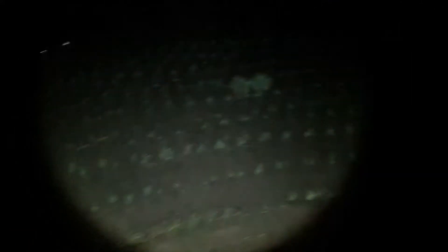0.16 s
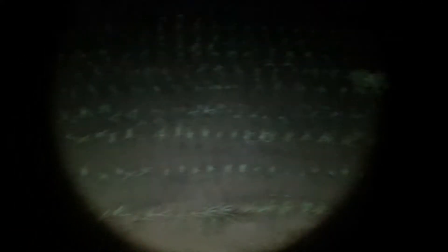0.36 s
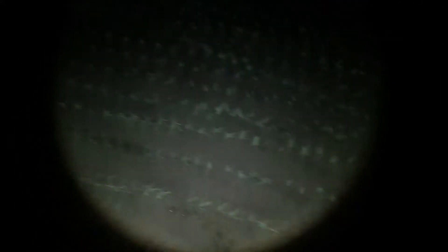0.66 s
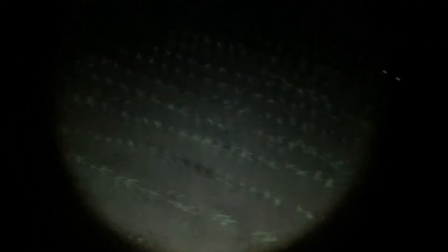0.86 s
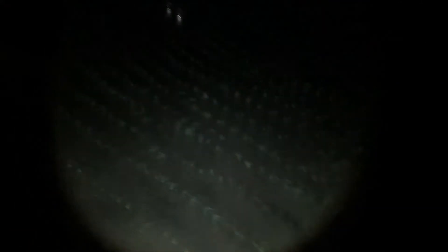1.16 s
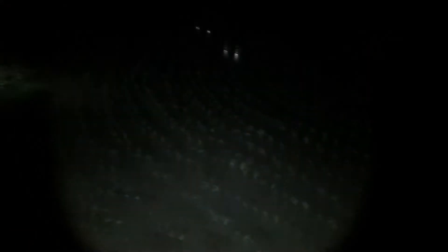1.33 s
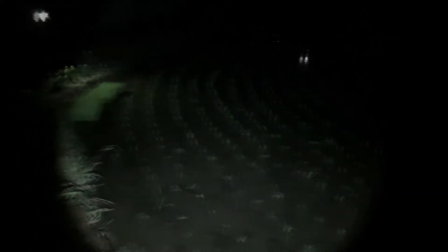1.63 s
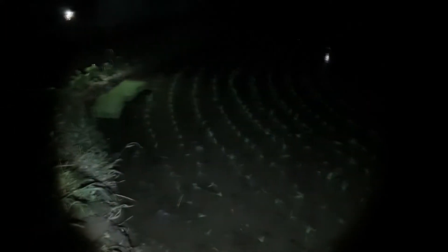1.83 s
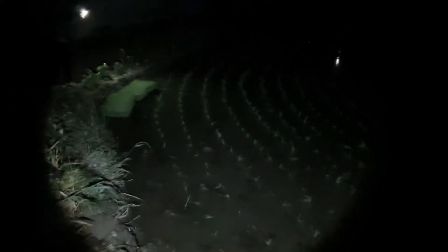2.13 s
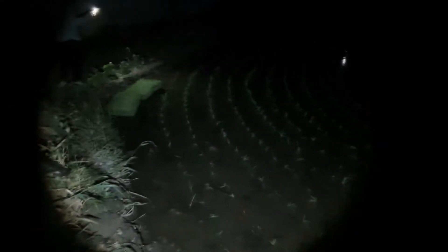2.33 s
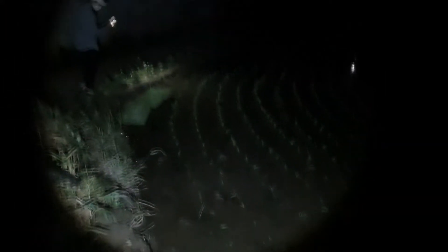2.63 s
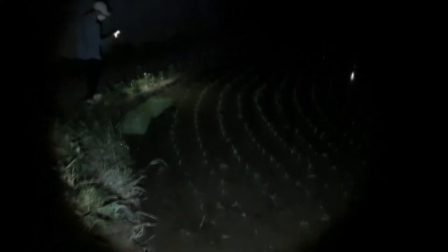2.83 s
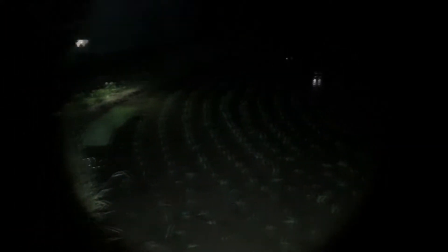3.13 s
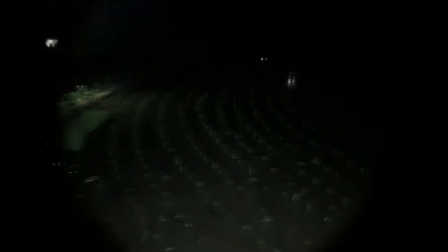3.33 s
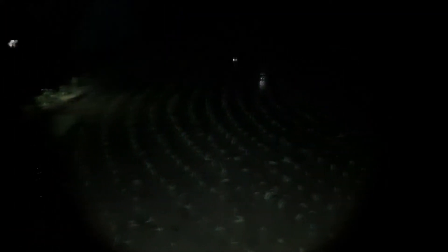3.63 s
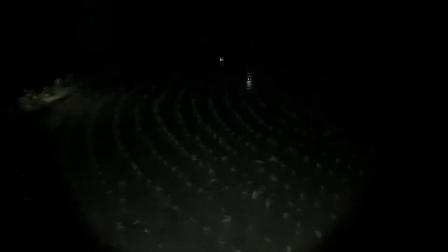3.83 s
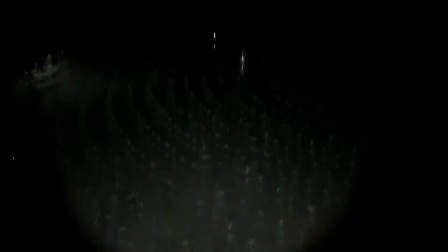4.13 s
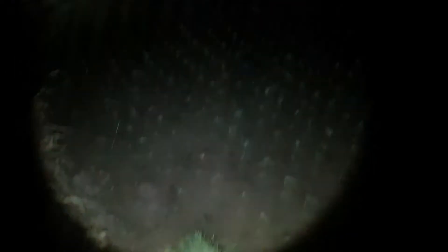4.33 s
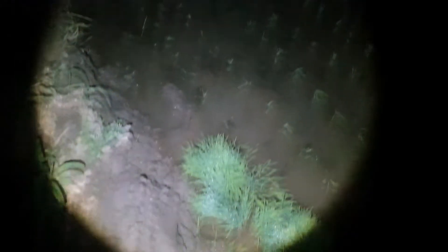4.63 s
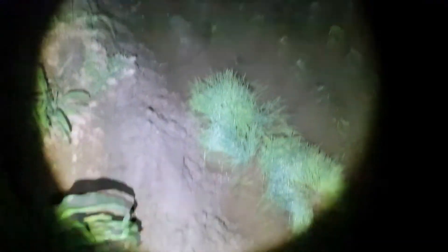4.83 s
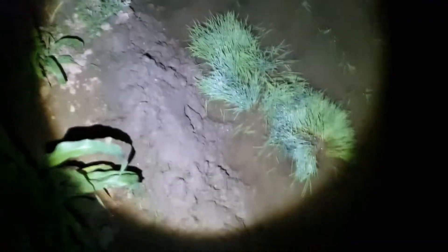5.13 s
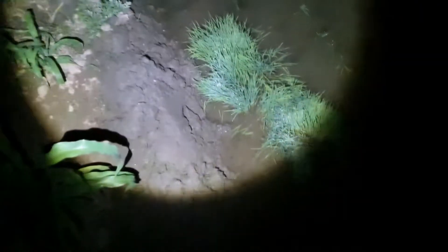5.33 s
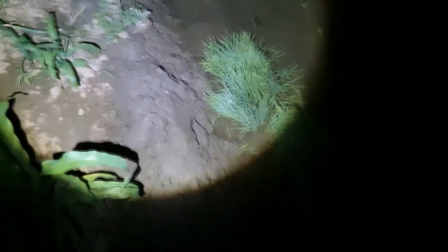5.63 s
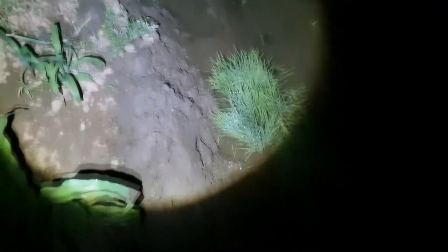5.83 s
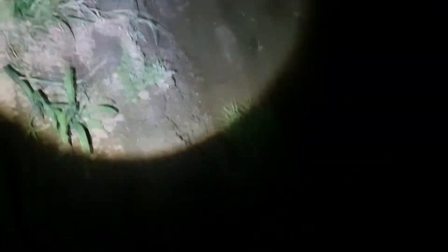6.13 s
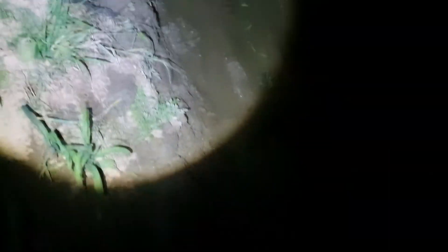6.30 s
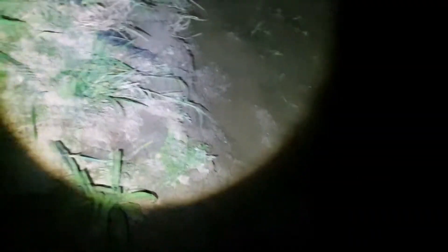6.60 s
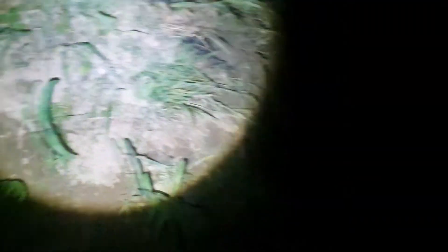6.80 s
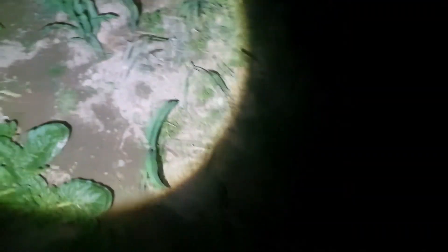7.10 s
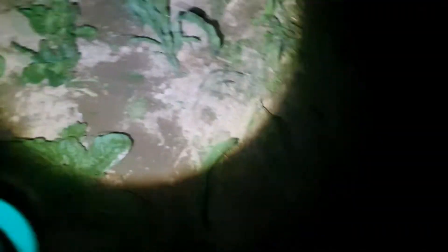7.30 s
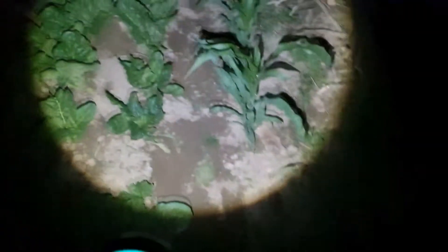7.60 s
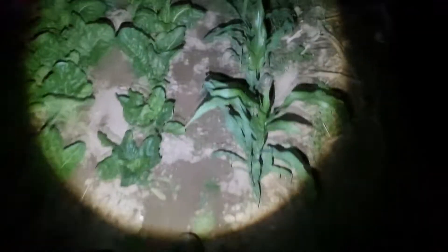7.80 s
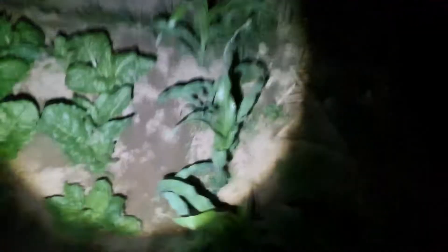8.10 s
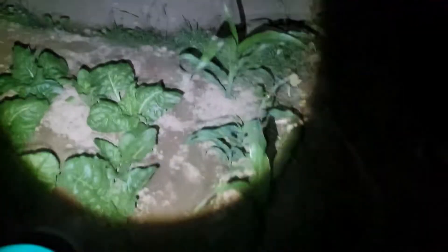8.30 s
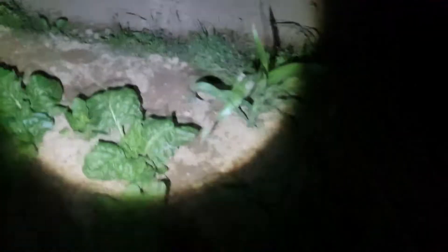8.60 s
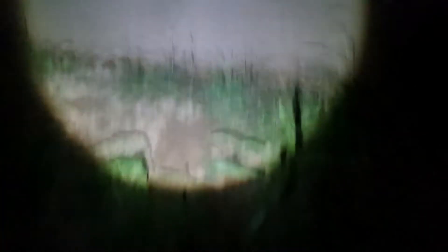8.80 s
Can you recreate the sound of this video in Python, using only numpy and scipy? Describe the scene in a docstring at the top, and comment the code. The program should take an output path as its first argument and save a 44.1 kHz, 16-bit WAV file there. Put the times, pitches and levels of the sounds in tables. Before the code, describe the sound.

Outdoors at night by a flooded field, many tree frogs give short, high, pulsed calls that overlap almost without pause from both sides, over a far chorus. One nearby frog adds six smooth squeaks midway. Later leaves brush and stems snap, mostly on the right, with a few dull footfalls. Low traffic rumble lies beneath; handheld spaced stereo microphones.

```python
"""Tree frogs call in overlapping pulsed notes around a flooded field at night, over a far chorus and distant traffic.
One frog close by gives six smoother, squeaky notes. A walker carrying two spaced microphones brushes through plants.
Frogs are pulse trains ringing a vocal sac, or hoarse pulses through throat resonances, with echoes off the field.
Traffic is wavering drones and shaped noise, plants are crackling hiss and snaps, footfalls are short dull knocks."""
import sys
import numpy as np
from scipy import signal
from scipy.fft import rfft, irfft, next_fast_len
from scipy.io import wavfile
from scipy.ndimage import uniform_filter1d

SR = 44100
rng = np.random.default_rng(int(sys.argv[2]) if len(sys.argv) > 2 else 0)


def materialize(psi):
    """Save the field psi as 16-bit PCM at rate SR to the path in sys.argv[1].

    A 1-D psi becomes a single channel; in a 2-D psi each row is a channel.
    """
    bounded = np.clip(np.atleast_2d(psi).T, -1, 1)
    quanta = np.round(bounded * 32767).astype(np.int16)
    wavfile.write(sys.argv[1], SR, quanta)


N = 394694

# near frog notes, grouped by the side they come from:
# left over right/dB, left lags right/ms, overtones/dB, low ring/dB, notes as (t/s, level/dB)
NEAR_NOTES = [ (-0.2, .51, 0.9, 2, [(.281, -18), (.508, -17), (.741, -16)]),
              (0, .44, -1, -0.8, [(.023, -19), (.35, -34.5), (.955, -15), (1.508, -18), (1.759, -20.5),
              (2.23, -30.5), (2.445, -25), (2.493, -20.5), (2.66, -28), (2.759, -18.5), (3.194, -19),
              (3.28, -31), (3.43, -28.5), (3.502, -22.5), (3.99, -34), (3.645, -17.5), (4.198, -17.5),
              (4.552, -23), (4.738, -20.1), (4.78, -23), (5.033, -18), (5.14, -22), (5.224, -24),
              (6.143, -20.5), (6.417, -27.5), (6.765, -18.5), (7.165, -23), (7.248, -23.5), (7.858, -24),
              (8.614, -24.5)]), (5.5, .46, -1.3, -0.3, [(.09, -21), (.572, -22.5), (.798, -22.5),
              (1.004, -19.5), (1.05, -24), (1.321, -24), (1.571, -17.5), (1.893, -21), (2.704, -23.5),
              (2.793, -20.5), (3.556, -26), (4.14, -21), (4.453, -20), (4.601, -20.5), (4.906, -19.5),
              (5.077, -23), (5.388, -17), (5.718, -22.5), (5.93, -27.5), (6.465, -26.5), (6.835, -24),
              (7.1, -24.5), (7.314, -23), (7.98, -24.5), (8.308, -23.5), (8.563, -27), (8.867, -25)]),
              (0.4, -0.43, -1, -1, [(1.212, -19), (2.033, -19.5), (2.295, -23), (2.559, -22.5),
              (2.996, -19.5), (3.235, -17.5), (3.725, -26), (3.897, -16.5), (3.938, -21), (4.328, -19.5),
              (4.945, -26), (5.268, -17.5), (5.675, -18.5), (6.001, -19), (6.985, -24.5), (7.556, -20),
              (8.021, -18.5), (8.15, -24)]), (6.5, -.44, 0, -0.9, [(1.248, -24.5), (1.812, -25),
              (2.078, -23.5), (2.33, -20.5), (3.03, -28.5), (5.781, -21.5), (6.05, -23.5), (6.307, -17.5),
              (6.563, -25.5), (6.603, -21.5), (6.881, -27), (7.423, -23.5), (7.698, -19.5), (7.792, -25.5),
              (8.213, -26.5), (8.437, -22), (8.752, -24.5)])]
# far chorus: t/s, level/dB, level change with time since the last near note/dB per s
FAR_COURSE = [(0, -42, -69.5), (3, -41, -69.5), (4.1, -43, -60), (6, -37, -29.5), (8.95, -38, -25)]
SAC_HZ = 2914.4  # central pitch of the vocal sac


def gain_of(db):
    """Decibels to gain."""
    return 10 ** (np.asarray(db) / 20)


def evened(x):
    """Scales to rms 1."""
    return x / np.sqrt(np.mean(x ** 2) + 1e-20)


def read(points, hz):
    """Reads a table of (f/Hz, value) on a log frequency axis."""
    f, value = np.transpose(points)
    return np.interp(np.log(hz + 1), np.log(f + 1), value)


def along(rows):
    """Draws the columns of a time table out to every sample."""
    s, *columns = np.transpose(rows)
    return [np.interp(np.arange(N) / SR, s, c) for c in columns]


def add(mix, s, sound):
    """Mixes a sound in at a time, cut off at the end of the scene."""
    part = mix[max(round(s * SR), 0):][:len(sound)]
    part += sound[:len(part)]


def place(mix, s, sound, pan_db, lag_ms):
    """Reaches the two microphones with a level and time difference, split evenly between them."""
    add(mix[0], s + lag_ms / 2000, gain_of(pan_db / 2) * sound)
    add(mix[1], s - lag_ms / 2000, gain_of(-pan_db / 2) * sound)


def resonate(x, hz, width):
    """Shifts the curve hz down to zero, smooths, and shifts back: a resonance of gain 1."""
    turn = np.exp(2j * np.pi * np.cumsum(hz * np.ones(len(x))) / SR)
    r = np.exp(-np.pi * width / SR)
    smooth = signal.lfilter([1 - r], [1, -r], x / turn)
    return 2 * (turn * smooth).real


def noise(spectrum, patchy_db, size=2048):
    """Two-channel noise of a spectrum with drifting patches; the channel likeness varies with frequency."""
    # f/Hz, left-right likeness from -1 (opposed) to 1 (alike)
    likeness = [(60, 1), (130, 0.97), (290, 0.81), (640, 0.31), (1410, -0.32), (3100, 0.091), (6820, -0.39),
                (15000, 1)]
    frames, hz = 4 * N // size + 5, np.fft.rfftfreq(size, 1 / SR)
    a, b, c, d, patches = rng.standard_normal((frames, len(hz), 5)).T
    patches = uniform_filter1d(patches, size=12, axis=0)  # over frequency
    patches = evened(uniform_filter1d(patches, size=10, axis=1))  # over time
    same = np.clip(read(likeness, hz), -1, 1)[:, None]
    left = a + 1j * b
    right = same * left + np.sqrt(1 - same ** 2) * (c + 1j * d)
    z = np.array([left, right]) * gain_of(read(spectrum, hz)[:, None] + patchy_db * patches)
    return evened(signal.istft(z, nperseg=size, noverlap=3 * size // 4)[1][:, :N])


def note(hz, overtones_db, low_db=0, jitter=.025, uneven_db=1.2):
    """A quickening train of laryngeal pulses, each ringing the vocal sac afresh as its pitch climbs."""
    # what each pulse rings: multiple of the sac pitch, relative level/dB, time to the peak/ms
    sac_rings = [(0.454, -12.5, 1.016), (0.801, -22.5, 1.26), (1, -5, 1.8), (1.246, -27, 1.5),
                 (1.559, -30.5, 1.03), (1.949, -30.5, 0.37), (2.599, -26.5, 0.42), (2.897, -30.5, 1.8)]
    # course of a note: share of its length, level/dB, pitch factor, pulse rate/Hz before each note's own scatter
    course = [(0, -14, .915, 195), (.25, -5, .96, 208), (.55, -.5, 1.005, 222), (.8, -1, 1.03, 235),
              (1, -9, 1.035, 240)]
    note_s = .097
    low_early_db = 4  # extra low ring at the start of a note, gone by its end
    share, *columns = np.transpose(course)
    u = np.arange(round(note_s * SR)) / (note_s * SR)
    db, bend, rate = (np.interp(u, share, c) for c in columns)

    own_rate = 1 + .04 * rng.standard_normal()
    chance = rng.standard_normal((40, 3))
    pulse_count = np.floor(np.cumsum(rate * own_rate) / SR)
    at = np.flatnonzero(np.diff(pulse_count, prepend=-1))
    chance = chance[:len(at)]
    start = np.maximum(at + (jitter * chance[:, 0] * SR / rate[at]).astype(int), 0)

    t = np.arange(400) / SR
    pulse_hz = (hz * bend[at] * (1 + .008 * chance[:, 1]))[:, None]
    low_ring_db = low_db + low_early_db * (1 - u[at, None])
    rings = 0
    for multiple, ring_db, peak_ms in sac_rings:
        rise = 1000 * t / peak_ms
        swell = (rise * np.exp(1 - rise)) ** 2
        colour_db = ring_db + overtones_db * (multiple > 1.4) + low_ring_db * (multiple < .6)
        rings = rings + gain_of(colour_db) * swell * np.sin(2 * np.pi * multiple * pulse_hz * t)
    rings = rings * gain_of(db[at] + uneven_db * chance[:, 2])[:, None]

    out = np.zeros(len(u) + 800)  # room for the last rings
    np.add.at(out, start[:, None] + np.arange(len(t)), rings)
    return out


def near_frogs():
    """Every near note from its side, its balance and overtones shifted by the walker's turning."""
    # the walker turns: t/s, added left over right/dB, added overtones/dB
    turning = [(0, -0.7, 0.8), (3, -0.8, -0.9), (4.8, -0.8, -1), (6.5, -1.4, -2), (7.5, 2.5, 0),
               (8.95, 0.5, 1)]
    scatter_ms, scatter_db = .04, 1.5  # notes on one side differ a little in lag and in overtones
    out, (swing_db, shade_db) = np.zeros((2, N)), along(turning)
    for pan_db, lag_ms, overtones_db, low_db, notes in NEAR_NOTES:
        for s, db in notes:
            n, (pitch, lag, colour) = round(s * SR), rng.standard_normal(3)
            note_overtones_db = overtones_db + shade_db[n] + scatter_db * colour
            sound = note(SAC_HZ * (1 + .012 * pitch), note_overtones_db, low_db)
            place(out, s, gain_of(db) * sound, pan_db + swing_db[n], lag_ms + scatter_ms * lag)
    return out


def squeaks():
    """Fast pulses, steady at first and then hoarse, through a throat whose resonances climb."""
    # squeaky notes: t/s, starting pitch f/Hz, level/dB
    squeak_notes = [(4.455, 544, -36), (4.732, 554, -34), (5.008, 567, -33.5), (5.262, 589, -33),
                    (5.517, 588, -32.5), (5.782, 585, -34)]
    # throat resonances before the opening moves them: f/Hz, width/Hz, level/dB
    throat_resonances = [(1340, 390, 8), (1880, 1400, -4.5), (2380, 840, 3), (3630, 660, -2),
                         (7100, 1270, -14.5), (7700, 3600, -27)]
    squeak_s, top_hz = .096, 630
    fresh_rough, tired_rough, tires_s = .22, .62, 5  # starting roughness 0-1 before and after the voice tires
    treble_climb = 2.3  # resonances over 5000 Hz climb with this power of the opening
    out = np.zeros((2, N))
    for s, first_hz, db in squeak_notes:
        n = round(squeak_s * SR)
        u = np.linspace(0, 1, n)
        rough = fresh_rough if s < tires_s else tired_rough
        hoarse = np.clip(rough + .5 * u ** 4, 0, 1)  # breaks up at the end
        wobble = evened(uniform_filter1d(rng.standard_normal(n), size=60))
        pitch_hz = first_hz + (top_hz - first_hz) * u ** .8
        turns = np.cumsum(pitch_hz * (1 + .09 * hoarse * wobble)) / SR
        folds = sum(np.cos(2 * np.pi * k * turns) for k in range(1, 15))
        puffs = np.exp(-(turns % 1) / 0.59) * rng.standard_normal(n)  # a burst of breath in each cycle
        drive = (1 - hoarse) * evened(folds) + hoarse * evened(puffs)

        opening = 0.844 + 0.17 * u
        throat = 0
        for k, (f, width, ring_db) in enumerate(throat_resonances):
            moving_hz = f * opening ** (treble_climb if f > 5000 else 1)
            ring = resonate(resonate(drive, moving_hz, width), moving_hz, width)
            throat = throat + (-1) ** k * gain_of(ring_db) * ring  # alternating sign
        sound = gain_of(db) * evened(throat) * signal.windows.tukey(n, .45)
        place(out, s, sound, -1.2, -.4)
    return out


def field(x):
    """Echoes off water and plants: sparse taps of random sign, other ones at each microphone, with the treble lost."""
    t60, dull_hz = .22, 3600  # decay by 60 dB in s, treble cutoff in Hz
    # one tap at random in every 20 samples
    at = np.arange(100, SR // 2 - 20, 20) + rng.integers(0, 20, (2, (SR // 2 - 101) // 20))
    strength = rng.choice([-1., 1.], at.shape) * gain_of(-60 * at / SR / t60)
    taps = np.zeros((2, SR // 2))
    np.put_along_axis(taps, at, strength, 1)
    dull = signal.sosfilt(signal.butter(2, dull_hz, fs=SR, output="sos"), x)
    return signal.fftconvolve(dull, taps / np.linalg.norm(taps[0]), axes=1)[:, :N]


def plants():
    """Leaves scrape as hiss with fine crackles, stems snap; mostly on the right."""
    # plants brushing past: t/s of the peak, level/dB before panning, time to swell or fade by 20 dB/s
    brushes = [(4.8, -64.5, 1.1), (5.73, -52, 0.07), (5.8, -54.5, 0.1), (5.95, -65, .5), (6.5, -57.5, 0.2),
               (7.0, -64, 0.8), (7.25, -62.5, 0.2), (7.55, -49, .08), (7.75, -54.5, 0.09),
               (7.99, -62, 0.22), (8.07, -57.5, .15), (8.24, -45, 0.02), (8.42, -55.5, 0.34),
               (8.6, -60, 0.34), (8.75, -60.5, 0.2)]
    # stems snapping: t/s, starting level/dB before panning
    snaps = [(2.6515, -59), (5.6956, -59), (5.8218, -46), (6.7212, -50), (7.405, -49), (7.501, -61),
             (7.6441, -56), (7.7115, -49), (7.9494, -60), (8.2612, -44), (8.2857, -47), (8.414, -50),
             (8.61, -47)]
    # leaf hiss: f/Hz, relative level/dB per Hz
    leaf_spectrum = [(300, -27.5), (1000, -7), (3000, -1), (6000, -13.5), (9000, -3), (11000, 6),
                     (13000, -2.5), (15500, -12.5)]
    crackles_per_s, crackle_share, patchy_db = 600, .15, 2.5
    t = np.arange(N) / SR
    level = sum(gain_of(db - 20 * abs(t - s) / fade_s) for s, db, fade_s in brushes)
    crackles = (rng.random(N) < crackles_per_s / SR) * gain_of(2.0 * np.minimum(rng.exponential(1, N), 5))
    crackling = evened(signal.lfilter([1], [1, -.95], crackles))
    level = level * (1 - crackle_share + crackle_share * crackling)
    for s, db in snaps:
        add(level, s, gain_of(db - 60 * np.arange(2000) / SR / 0.025))  # falls 60 dB in 25 ms
    pan = gain_of([[-2.5], [10.5]])  # left, right
    return pan * level * noise(leaf_spectrum, patchy_db, size=256)


def footfalls(hz=397.0, width=840.0, t60=0.093):
    """Dull knocks of a shoe on soil: dying noise through one broad resonance, alike at both microphones."""
    # t/s, starting level/dB
    steps = [(7.715, -37), (7.75, -35.5), (8.61, -46)]
    out, t = np.zeros(N), np.arange(4000) / SR
    for s, db in steps:
        thud = evened(resonate(rng.standard_normal(len(t)), hz, width))
        add(out, s, gain_of(db - 60 * t / t60) * thud)
    return out


def far_chorus(spread=.03):
    """Many distant frogs: random notes from all sides, loudest just after a near note."""
    out, per_s, range_db = np.zeros((2, N)), 70, 5
    voices = [note(SAC_HZ * (1 + spread * rng.standard_normal()), -2.5) for _ in range(16)]
    draws = rng.random((1000, 5))
    times = np.cumsum(-np.log(draws[:, 0]) / per_s) - .1  # random gaps
    laggard_db_per_s = along(FAR_COURSE)[1]
    near = np.sort([-.1] + [s for *_, notes in NEAR_NOTES for s, _ in notes])
    for s, (_, who, size, side, lag) in zip(times[times < N / SR], draws):
        late_s = s - near[np.searchsorted(near, s) - 1]  # since the last near note
        n = max(round(s * SR), 0) % N
        db = range_db * size + laggard_db_per_s[n] * late_s
        place(out, s, gain_of(db) * voices[int(16 * who)], 6.6 * side - 2.5, lag - .5)
    return evened(out)


def traffic():
    """Two wavering engine drones, nearly alike at both microphones, under rumble, roar and tyre wash."""
    # t/s, deep drone level/dB, upper drone level/dB (rumble follows it), roar level/dB, tyre wash level/dB
    course = [(0, -44.5, -48, -50.5, -44), (2.4, -42, -48, -57, -44), (3.6, -47, -49.5, -58, -45.5),
              (5, -44.5, -47, -56.5, -43), (6.6, -44.5, -44, -56.5, -43), (7.2, -43, -44.5, -54, -46.5),
              (8.3, -40.5, -43.5, -50.5, -45.5), (8.95, -42.5, -45, -52, -46)]
    # engine drones, deep then upper: f/Hz, width/Hz
    drone_bands = [(52, 9.6), (74, 34)]
    # noise spectra: f/Hz, relative level/dB per Hz
    rumble_spectrum = [(30, -18), (60, -7.5), (100, 1.9), (150, -9), (195, -2), (250, -13), (400, -46.5),
                       (5000, -67)]
    roar_spectrum = [(180, -18), (290, 1.2), (400, -6), (520, -2), (700, -16.5), (5000, -70)]
    wash_spectrum = [(450, -13), (620, -3), (800, 0.3), (1050, -4.5), (1500, -3), (2200, -12), (4000, -24),
                     (7000, -35.5), (9500, -56), (15000, -63.5)]
    *drones_db, roar_db, wash_db = along(course)
    rumble_db = drones_db[1] - 2.5  # just under the upper drone
    drones = 0
    for db, (hz, width) in zip(drones_db, drone_bands):
        hums = rng.standard_normal((2, N))
        mid, side = (evened(resonate(resonate(v, hz, width), hz, width)) for v in hums)
        drones = drones + gain_of(db) * (mid + gain_of(-20.0) * np.outer([1, -1], side))
    layers = (rumble_db, rumble_spectrum), (roar_db, roar_spectrum), (wash_db, wash_spectrum)
    return drones + sum(gain_of(db) * noise(spectrum, 1.1) for db, spectrum in layers)


def scene():
    """Frogs and their echoes over plants, steps, the far chorus and traffic."""
    frogs = near_frogs() + squeaks()
    echoes = gain_of(-9) * field(frogs)
    chorus = gain_of(along(FAR_COURSE)[0]) * far_chorus()
    return frogs + echoes + plants() + footfalls() + chorus + traffic()


def record(dry):
    """Colour of each microphone, its own hiss, then the band limit."""
    # microphones, the left one shaded in the treble: f/Hz, left level/dB, right level/dB
    ports = np.array([(1130, -0.46, -0.07), (3230, 8, 7), (4250, 8, 7.5), (5430, -1, 8), (7000, -31.5, 2.5),
                      (8790, -32, -9), (11400, -15.5, -15.5), (15000, -16.5, -12.5)])
    hiss_db, edge_hz = -86, 15700  # hiss before the band limit, upper edge of the band
    size = next_fast_len(N)
    hz = np.fft.rfftfreq(size, 1 / SR)
    colour = gain_of([read(ports[:, [0, side]], hz) for side in (1, 2)])
    coloured = irfft(rfft(dry, size) * colour, size)[:, :N]
    heard = coloured + gain_of(hiss_db) * rng.standard_normal(dry.shape)
    band = signal.firwin(511, edge_hz, window=("kaiser", 9), fs=SR)
    return signal.oaconvolve(heard, band[None], "same")


dry = scene()
out = record(dry)
materialize(out)
```